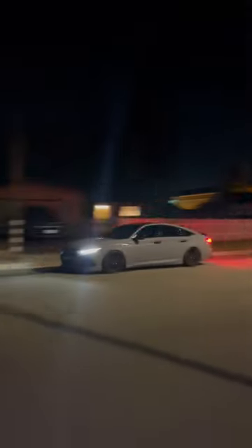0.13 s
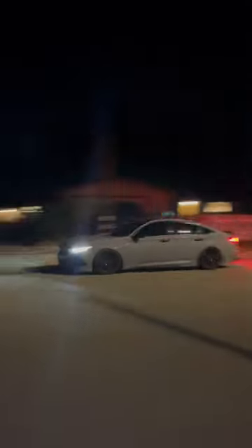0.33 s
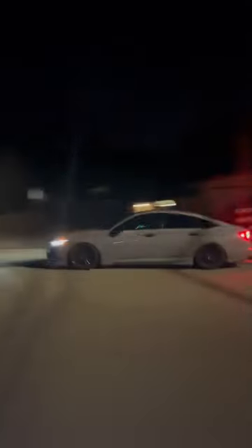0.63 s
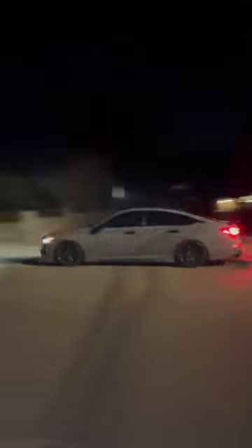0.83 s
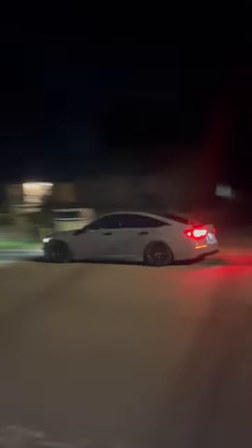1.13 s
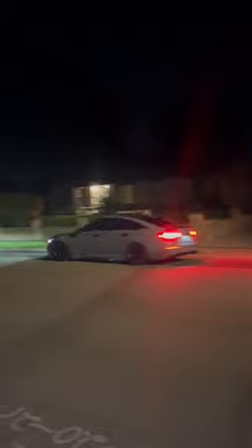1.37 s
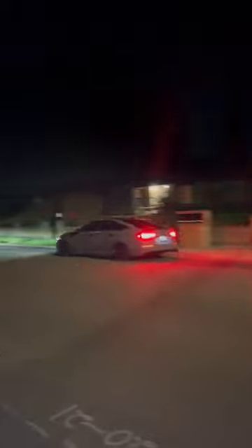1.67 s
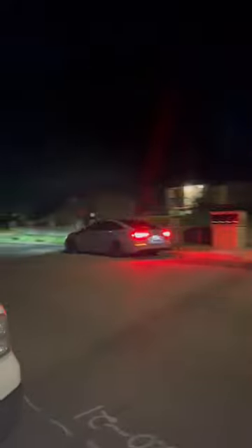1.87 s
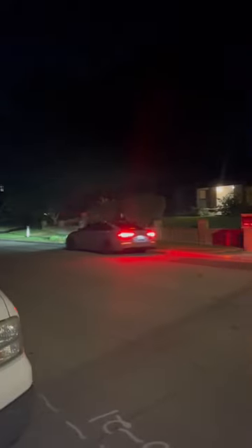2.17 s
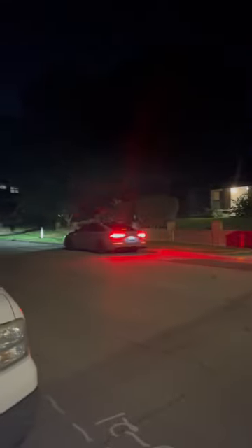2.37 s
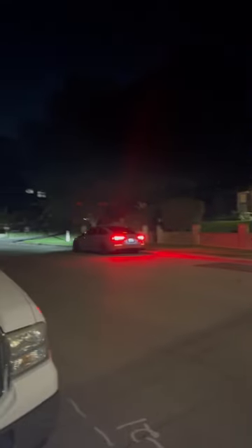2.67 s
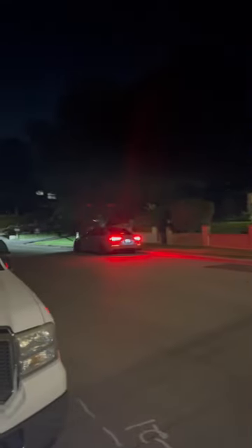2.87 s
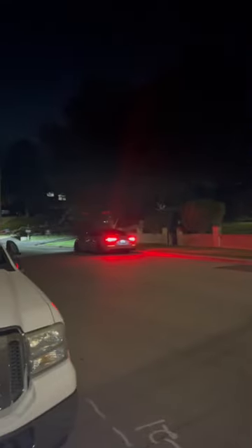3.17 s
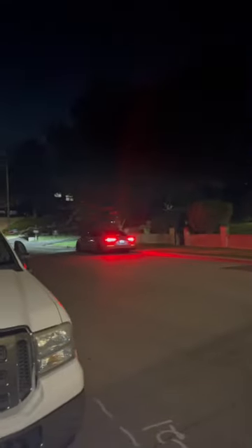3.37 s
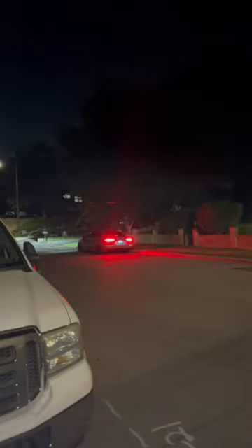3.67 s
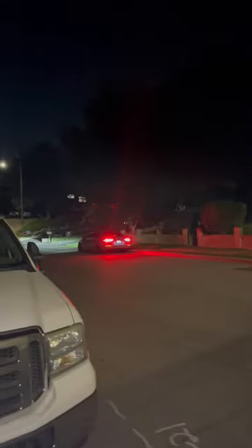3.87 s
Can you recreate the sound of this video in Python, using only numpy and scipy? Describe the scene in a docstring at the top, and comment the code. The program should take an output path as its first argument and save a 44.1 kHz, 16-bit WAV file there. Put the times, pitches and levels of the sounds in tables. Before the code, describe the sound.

Exhaust pops from a passing car crackle densely and loudly from 0 to about 1.1 s, with raspy gas, road roar and thin tyre hiss. Sharper cracks stand out near 0.65, 0.76, 1.08 and 1.74 s, echoing off the street. The engine hum slides down as pops grow sparse and dull by 2.4 s. After 3 s only faint low drone and rumble remain, with tiny hard ticks nearby from 2.5 to 3.5 s.

```python
"""A quiet street at night: a car coasts past and away off the throttle, its revs falling. Unburnt fuel pops in
the exhaust: each pop is a short falling chirp that rings the pipe (resonators) and bounces off walls (sparse
decaying echoes), some with a treble crack (noise burst). Around them: firing hum and late drone (sines),
tailpipe rasp, road roar and thin hiss (shaped noise), and small hard ticks nearby (decaying modes)."""
import sys
import numpy as np
from scipy import signal
from scipy.fft import rfft, irfft, next_fast_len
from scipy.io import wavfile
from scipy.ndimage import uniform_filter1d

SR = 44100
rng = np.random.default_rng(int(sys.argv[2]) if len(sys.argv) > 2 else 0)


def log_audio(samples):
    """Write samples as a 16-bit WAV file to the path given in sys.argv[1]."""
    # one column per channel
    frames = np.atleast_2d(samples).T
    # limit to full scale, then quantise
    limited = np.clip(frames, -1, 1)
    pcm = np.round(limited * 32767).astype(np.int16)
    wavfile.write(sys.argv[1], SR, pcm)


N = 176400
BIN_HZ = np.fft.rfftfreq(1024, 1 / SR)
FRAME_S = np.arange(N // 256 + 5) * 256 / SR


def amp(db):
    """Decibels to amplitude ratio."""
    return 10 ** (np.asarray(db, float) / 20)


def evened(x):
    """Scale to unit RMS."""
    return x / np.sqrt(np.mean(x ** 2) + 1e-20)


def read(points, hz):
    """Interpolate a frequency table on a log frequency axis."""
    f, value = np.transpose(points)
    return np.interp(np.log(hz + 1), np.log(f + 1), value)


def curves(table, t=None):
    """Interpolate every column of a time table, at each sample by default."""
    t = np.arange(N) / SR if t is None else t
    cols = np.transpose(table)
    return [np.interp(t, cols[0], c) for c in cols[1:]]


def slow(width_s):
    """Unit-RMS random drift: white noise through two moving averages."""
    width = int(width_s * SR)
    x = uniform_filter1d(rng.standard_normal(N), width, mode="wrap")
    return evened(uniform_filter1d(x, width, mode="wrap"))


def noise(shape_db, patchy_db):
    """Noise from a dB field (513 bins x frames), its level drifting in patches."""
    a, b, patches = rng.standard_normal((shape_db.shape[1], 513, 3)).T
    patches = uniform_filter1d(patches, size=8, axis=0)
    patches = evened(uniform_filter1d(patches, size=8, axis=1, mode="wrap"))
    field = (a + 1j * b) * amp(shape_db + patchy_db * patches)
    return signal.istft(field, nperseg=1024, noverlap=768)[1][512:][:N]


def steady_noise(colour, patchy_db):
    """Noise of one fixed spectrum, in drifting patches."""
    return noise(read(colour, BIN_HZ)[:, None] + 0 * FRAME_S, patchy_db)


def train(times_s, sizes):
    """Single-sample clicks."""
    x = np.zeros(N)
    at = (np.asarray(times_s) * SR).round().astype(int)
    np.add.at(x, np.clip(at, 0, N - 1), sizes)
    return x


# engine on the overrun: start_s, firing_hz, hum_db, second_order_db, burble_db (before BURBLE_TRIM_DB)
OVERRUN = [(0, 134, -28.5, -24.5, -27), (.47, 124.1, -29, -16, -10.5), (.87, 114.9, -34.5, -42.5, -17),
           (1.23, 100, -22.5, -28, -32.5), (1.38, 96, -18.5, -39, -41.5), (1.5, 93.5, -20.5, -44, -28.5),
           (1.72, 89.06, -15, -36, -29.5), (1.82, 86.5, -23.5, -33, -38.5), (2.05, 78.75, -35, -39, -23),
           (2.3, 71.5, -38.5, -30, -30), (2.55, 61, -28.5, -41, -27), (2.75, 56.26, -25.5, -33, -55),
           (2.9, 50.64, -37, -37.5, -51), (3.1, 46.6, -37.5, -38, -39.5)]
BURBLE_TRIM_DB = -9


def firings():
    """Weak, uneven pops, one per engine firing, fading out by 3.3 s."""
    hz, _, _, burble_db = curves(OVERRUN)
    cycles = np.cumsum(hz) / SR
    at = np.flatnonzero(np.diff(np.floor(cycles)))
    fade = np.clip((3.3 - at / SR) / 0.52, 0, 1)
    return at / SR, amp(burble_db[at] + BURBLE_TRIM_DB) * fade


# two quick repeats of each pop as the tail swings round: start_s, delay_ms, first_db, second_db
REPEATS = [(0, 3.8, -20, -16), (.7, 3.8, -16, -14), (.9, 3.8, -5, -8), (1.4, 3.4, -3, -9),
           (1.9, 3.2, -5, -6), (2.4, 2.9, -4, -7), (2.8, 3.2, -10, -12)]


def repeats(s, size):
    """Times and sizes of each hit and its two repeats."""
    delay_ms, first_db, second_db = curves(REPEATS, s)
    return ((s, size), (s + delay_ms / 1000, size * amp(first_db)),
            (s + delay_ms / 500, size * amp(second_db)))


# the chirp peaks later, so lower, from farther off: start_s, stretch_ratio
DULLING = [(0, 1.05), (1.9, 1.05), (2.4, 1.35), (3.0, 1.9)]
CHIRP_LAG_S, CHIRP_CREST_S, CHIRP_GROWTH = 0.0003, 0.001, 1.39  # growth: half-cycle length ratio
CHIRP_PEAK_BASE_S, CHIRP_SPREAD, CHIRP_DB = 0.002, 0.16, -3  # spread: log-normal sigma of peak time


def chirps(s, size):
    """One falling chirp a pop, half cycles growing by a fixed ratio, peak times scattered."""
    t, out = np.arange(800) / SR, np.zeros(N + 2000)
    lag_ratio = (t + CHIRP_LAG_S) / (CHIRP_CREST_S + CHIRP_LAG_S)
    halves = np.log(lag_ratio) / np.log(CHIRP_GROWTH)
    scatter = np.exp(CHIRP_SPREAD * rng.standard_normal(len(s)))
    peak_s = CHIRP_PEAK_BASE_S * curves(DULLING, s)[0] * scatter
    u = t / peak_s[:, None]
    shapes = amp(CHIRP_DB) * np.cos(np.pi * halves) * (u * np.exp(1 - u)) ** 3
    for hit_s, hit_size in repeats(s, size):
        at = (hit_s * SR).round().astype(int)[:, None] + np.arange(len(t))
        np.add.at(out, at, hit_size[:, None] * shapes)
    return out[:N]


# exhaust pops: start_s, level_db (before CHIRP_DB)
POPS = [(0.0039, -4.5), (0.0191, -3), (0.05, -2), (0.0792, -2.5), (0.0858, 2.5), (0.0998, -4.5),
        (0.146, 0.5), (0.1609, 1), (0.1686, -4.5), (0.1831, -2.5), (0.205, 1), (0.213, -3.5), (0.2202, -5),
        (0.2592, -4.5), (0.2662, -4.5), (0.2977, -4.5), (0.3123, 1), (0.3603, -2.5), (0.3743, -3),
        (0.3815, -2), (0.39, -2), (0.4464, -6.5), (0.4862, -3.5), (0.4944, -0.5), (0.51, -5),
        (0.5259, -1.5), (0.534, 0), (0.5497, -3), (0.5821, -2), (0.5984, -2.5), (0.6228, -8),
        (0.6477, -1.5), (0.6561, -1), (0.7075, -6), (0.7658, 2), (0.8017, -0.5), (0.8266, -3), (0.8718, -9),
        (0.9157, -5.5), (0.924, -0.5), (0.9327, -1.5), (0.9454, -7.5), (0.9692, -8), (1.0336, -7.5),
        (1.0809, 1.5), (1.0891, -1.5), (1.0984, -6.5), (1.1087, -4), (1.1465, -7), (1.215, -10.5),
        (1.244, -11.5), (1.263, -4), (1.3865, -3), (1.4095, -8), (1.4194, -10.5), (1.5491, -11.5),
        (1.5565, -3.5), (1.5681, -9.5), (1.5934, -3.5), (1.66, -3), (1.7287, 1), (1.7405, -0.5),
        (1.7755, -2.5), (1.811, -10), (1.8242, -8), (1.8614, -9), (1.8986, -7), (2.0117, -5),
        (2.0245, -0.5), (2.0378, -6.5), (2.0651, -10), (2.092, -8), (2.2462, -7), (2.2744, -13.5),
        (2.2989, -16), (2.3924, -0.5), (2.4235, -3), (2.551, -13), (2.5706, -20), (2.6689, -16),
        (2.6934, -22.5), (2.8163, -14.5), (3.0163, -18), (3.037, -11.5), (3.395, -27)]
# exhaust pipe resonances: pitch_hz (before DOPPLER), level_db (before RING), t60_s
PIPE = [(62, -26, 0.17), (86.94, -21.5, 0.57), (177.7, -24, 0.11), (252.4, -12.5, 0.21), (308.7, -18, 0.16),
        (338.2, -24, 0.23), (432.5, -19.5, 0.12), (479, -12.5, 0.044), (1283, -8, 0.031),
        (1640, -15.5, 0.026)]
# pipe pitch as the car moves: start_s, pitch_ratio
DOPPLER = [(0, 1.07), (.35, 1.04), (.65, 1.0), (1.9, .99), (2.1, .95), (2.4, .98), (3.0, 1.02), (4, 1.02)]
# the ring carries better once the tail points this way: start_s, level_db
RING = [(0, -8.5), (.42, -3), (.7, 0.5), (1.3, -3), (1.5, 1), (1.9, -5), (2.1, -3.5), (2.6, -4), (3.2, -12),
        (4, -14.5)]
# road and engine roar: start_s, level_db, distance (0 near - 1 far)
ROAR = [(0, -16, 0.65), (.6, -25, 0), (1.2, -23.5, 0), (1.9, -24, 0.18), (2.4, -26.5, 0.21),
        (2.8, -32, 0.21), (3.0, -32.5, 0.69), (3.5, -37.5, 0.99), (4, -37.5, 1)]
FLOW_S, FLOW_DB, FAR_FLOW_DB = 0.0012, -28, 4  # gas flow: smoothing, level re roar, extra when far


def exhaust():
    """Pops and weak firings chirp; the same pushes, plus low gas flow, drive the pipe resonances."""
    s, db = np.transpose(POPS)
    weak_s, weak = firings()
    s, size = np.append(s, weak_s), np.append(amp(db), weak)
    roar_db, far = curves(ROAR)
    flow = amp(roar_db + FLOW_DB + FAR_FLOW_DB * far) * slow(FLOW_S)
    push = signal.oaconvolve(train(s + 0.00312, size) + flow, np.hanning(40) / 20)[:N]
    warped_s, ring = np.cumsum(curves(DOPPLER)[0]) / SR, 0
    for hz, mode_db, t60_s in PIPE:
        turn = np.exp(2j * np.pi * hz * warped_s)
        decay = amp(-60 / t60_s / SR)
        mode = turn * signal.lfilter([1], [1, -decay], push / turn)
        ring = ring + amp(mode_db) * mode.imag
    return chirps(s, size) + amp(curves(RING)[0]) * ring


# stronger treble cracks at these times: start_s, level_db
CRACKS = [(0.313, -24), (0.649, -14.5), (0.762, -14), (0.931, -29), (1.084, -16), (1.733, -17), (1.744, -9),
          (2.013, -36.5), (2.027, -32), (2.392, -40)]
# crack spectrum: freq_hz, density_db_per_hz (relative)
CRACK_COLOUR = [(1500, 11.5), (2500, 5), (4000, -2), (4600, 5.5), (6000, -6.5), (8000, -10), (12000, -29.5),
                (14000, -44)]
CRACK_DECAY_S, SPIT_DB = 0.0018, -44  # spit re pop


def cracks():
    """Decaying treble noise: a faint spit on every pop, plus the listed cracks, with repeats."""
    (s, db), (pop_s, pop_db) = np.transpose(CRACKS), np.transpose(POPS)
    all_s, size = np.append(s, pop_s), amp(np.append(db, pop_db + SPIT_DB))
    hits = sum(train(hit_s, hit_size) for hit_s, hit_size in repeats(all_s, size))
    env = signal.oaconvolve(hits, np.exp(-np.arange(1500) / SR / CRACK_DECAY_S))[:N]
    return env * evened(steady_noise(CRACK_COLOUR, 0))


# tailpipe gas: start_s, level_db
RASP = [(0, -24), (1.0, -36), (1.7, -37.5), (2.75, -46), (3.2, -54.5), (4, -60.5)]
# rasp spectrum: freq_hz, density_db_per_hz (relative)
RASP_COLOUR = [(400, -27), (700, -5), (1200, -9.5), (1600, -16.5), (3000, -29.5), (4500, -62)]
RASP_CLUMP_DB, RASP_CLUMP_S = 3.5, 0.011


def rasp():
    """Tailpipe gas: mid-band noise broken into quick clumps."""
    clumps = amp(RASP_CLUMP_DB * slow(RASP_CLUMP_S))
    return amp(curves(RASP)[0]) * evened(clumps * steady_noise(RASP_COLOUR, 0.6))


# after a change down: start_s, firing_hz, hum_db, second_order_db
LOW_GEAR = [(3.45, 78, -34, -48), (3.701, 71.55, -51, -33), (4, 64.64, -50, -42.5)]
# low drone as the car leaves: start_s, pitch_hz, level_db, octave_db
DRONE = [(2.9, 87.1, -44, -36), (3.35, 81.9, -40.5, -39.5), (3.75, 86.3, -44.5, -36.5)]
HUM_WAVER_DB = 2


def hum():
    """First and second firing orders, and the late drone with its octave, as wavering sines."""
    t, out = np.arange(N) / SR, 0
    for table in (OVERRUN, LOW_GEAR, DRONE):
        hz, one_db, two_db = curves(table)[:3]
        fade_in = np.clip((t - table[0][0] + 0.11) / 0.092, 0, 1)
        fade_out = np.clip((table[-1][0] + 0.15 - t) / 0.038, 0, 1)
        turn = 2 * np.pi * np.cumsum(hz) / SR
        first = amp(one_db + HUM_WAVER_DB * slow(0.041)) * np.sin(turn)
        second = amp(two_db + HUM_WAVER_DB * slow(0.024)) * np.sin(2 * turn)
        out = out + fade_in * fade_out * np.sqrt(2) * (first + second)
    return out


# roar spectra, near and far: freq_hz, density_db_per_hz (relative)
NEAR = [(24, -46.5), (40, -16), (86, 13.5), (166, -6), (263, 21.5), (433, 16), (1280, -6), (2800, -49.5),
        (3640, -86.5)]
FAR = [(24, -53), (40, -41.5), (76, 11), (178, 8.5), (283, -49), (350, 3), (751, -25), (1930, -55),
       (2800, -70), (3640, -90)]


def levelled(colour):
    """Spectrum in dB, normalised to unit total power."""
    db = read(colour, BIN_HZ)
    return db - 10 * np.log10(np.sum(amp(2 * db)))


def roar():
    """Road and engine: broad noise whose spectrum moves from near to far with distance."""
    db, far = curves(ROAR, FRAME_S)
    far = np.clip(far, 0, 1)
    near_db, far_db = levelled(NEAR), levelled(FAR)
    unit = np.std(noise(near_db[:, None] + 0 * db, 0))
    return noise(np.outer(near_db, 1 - far) + np.outer(far_db, far) + db, 1.0) / unit


# small hard ticks nearby: start_s, level_db, pitch_hz (before the mode ratio)
TICKS = [(2.519, -38, 1970), (2.585, -39.5, 2120), (2.838, -40, 1770), (2.936, -39.5, 1864),
         (2.96, -36.5, 2085), (3.223, -34, 1846), (3.528, -35, 1896)]
# tick modes: pitch_ratio, level_db, t60_s
TICK_MODES = [(0.699, -4, 0.03), (.93, 3.5, 0.015), (1.04, 1.5, 0.024), (1.219, -6, 0.036)]


def ticks():
    """Short sums of decaying modes near 2 kHz, each with a quick rebound."""
    out, t = np.zeros(N), np.arange(3000) / SR
    onset = 1 - np.exp(-t / 0.00058)
    for s, db, hz in TICKS:
        ring = sum(amp(mode_db - 60 * t / t60_s) * np.sin(2 * np.pi * hz * ratio * t)
                   for ratio, mode_db, t60_s in TICK_MODES)
        hits = train([s, s + 0.0083], amp(db) * np.array([1, 0.4]))
        out += signal.oaconvolve(hits, ring * onset)[:N]
    return out


# tyre hiss: start_s, level_db
HISS = [(0, -41.5), (.6, -48.5), (.75, -49), (1.5, -54.5), (2.6, -62.5), (2.8, -60.5), (2.95, -66.5),
        (4, -73.5)]
# hiss spectrum: freq_hz, density_db_per_hz (relative)
HISS_COLOUR = [(1500, -8.5), (2600, 7), (3600, 0.5), (5700, 0.5), (6500, -4), (8000, -5), (9300, -14.5),
               (10800, -1), (11900, -15.5), (12900, -32.5)]


def hiss():
    """Tyres: thin treble noise, slightly flickering."""
    return amp(curves(HISS)[0] + 2.1 * slow(0.028)) * evened(steady_noise(HISS_COLOUR, 2.4))


# street echo decay: freq_hz, t60_s
STREET = [(100, 0.33), (300, 0.58), (1000, 0.098), (3000, 0.33), (8000, 0.1)]


def street(x):
    """Sparse echoes off walls and cars, each band dying at its own speed."""
    taps = np.zeros((2, SR // 2))
    start = np.arange(300, SR // 2 - 40, 40)
    at = start + rng.integers(0, 40, (2, (SR // 2 - 301) // 40))
    np.put_along_axis(taps, at, rng.choice([-1., 1.], at.shape), 1)
    taps[1] = 0.95 * taps[0] + 0.3 * taps[1]  # sides mostly alike
    hz, t, z = signal.stft(taps, SR, nperseg=256)
    decay = amp(-60 * t / read(STREET, hz)[:, None])
    tail = signal.istft(z * decay, SR, nperseg=256)[1]
    return signal.fftconvolve(x[None], tail / np.linalg.norm(tail[0]), axes=1)[:, :N]


# port level: freq_hz, left_minus_right_db
PORT_BALANCE = [(60, -2.5), (140, -3), (250, -5), (490, -5.5), (740, -3.5), (1130, 0.5), (2600, 2.5),
                (4000, -5.5), (7000, -0.5), (9000, 7.5), (12000, -4.5)]
# port phase: freq_hz, left_lead_rad
PORT_PHASE = [(60, 0.0), (300, .1), (900, .6), (1290, .05), (2000, .3), (2600, 1.8), (3600, .85),
              (4700, 2.3), (6100, .3), (7200, 1.6), (9000, 3.14), (10800, 4.7), (11900, 6.0)]


def ports(x):
    """Two microphone ports hear the sound with frequency-dependent level and phase differences."""
    size = next_fast_len(N + 4096)
    hz = np.fft.rfftfreq(size, 1 / SR)
    half = amp(read(PORT_BALANCE, hz) / 2) * np.exp(0.5j * read(PORT_PHASE, hz))
    return irfft(rfft(x, size) * np.array([half, 1 / half]), size)[:, :N]


STREET_DB, CRACK_STREET_DB = -11.5, -18  # echo sends
ECHO_TURN_HZ = 0.85


def scene():
    """Sum the sources, add street echoes of the pops and cracks, split to two ports."""
    pops, spit = exhaust(), cracks()
    near = pops + spit + rasp() + hum() + roar() + ticks() + hiss()
    sent = amp(STREET_DB) * pops + amp(CRACK_STREET_DB) * spit
    turn = 2 * np.pi * ECHO_TURN_HZ * np.arange(N) / SR
    # two echo patterns slowly trade places, for variety
    echo = street(sent * np.cos(turn)) + street(sent * np.sin(turn))
    return ports(near + echo)


CEILING, BASS_CUT_HZ, EDGE_HZ = 0.84, 48.0, 13200


def record(dry):
    """Soft overload on the loudest pops, a bass roll-off, then the band limit."""
    soft = CEILING * np.tanh(dry / CEILING)
    bass_cut = signal.butter(6, BASS_CUT_HZ, "high", fs=SR, output="sos")
    band_limit = signal.firwin(511, EDGE_HZ, window=("kaiser", 9), fs=SR)
    return signal.oaconvolve(signal.sosfilt(bass_cut, soft), band_limit[None], "same")


dry = scene()
out = record(dry)
log_audio(out)
```